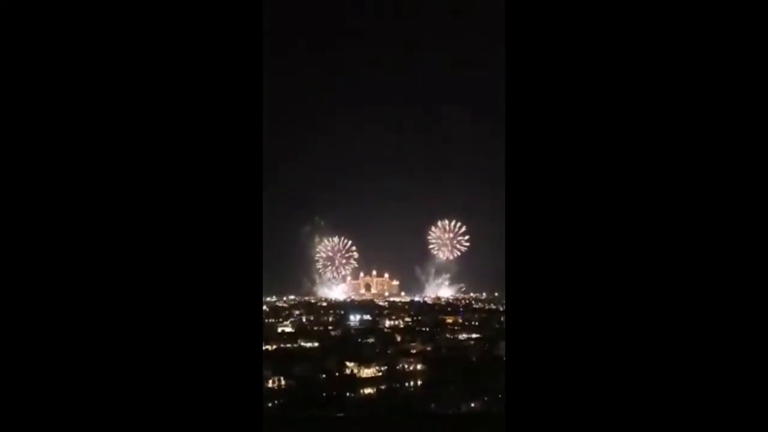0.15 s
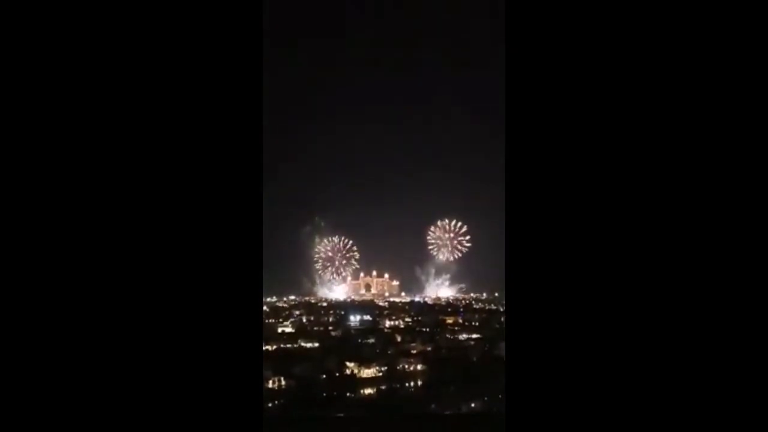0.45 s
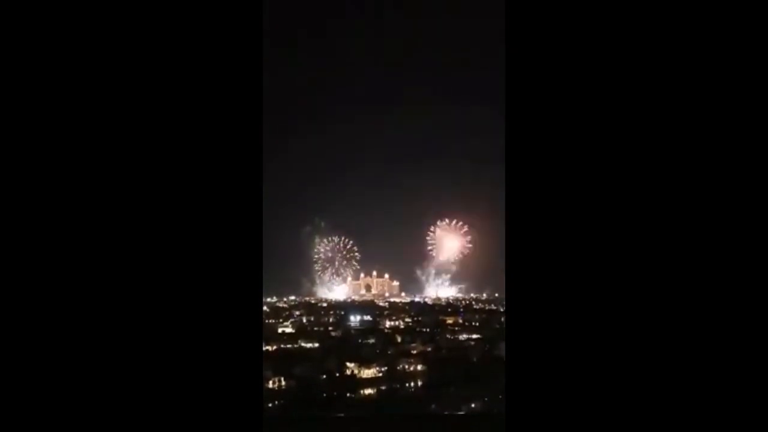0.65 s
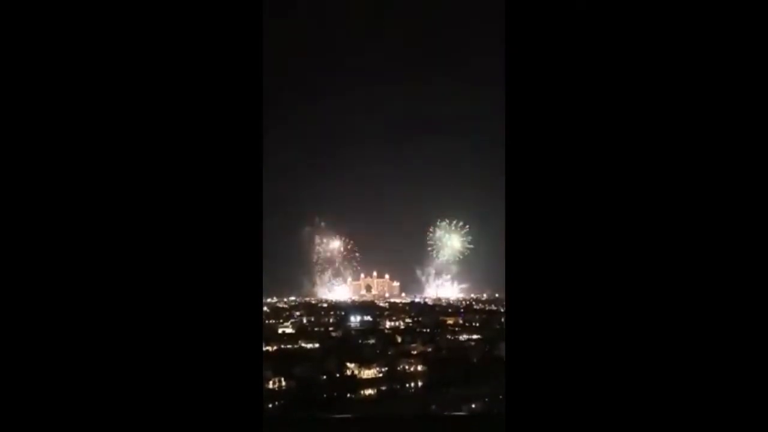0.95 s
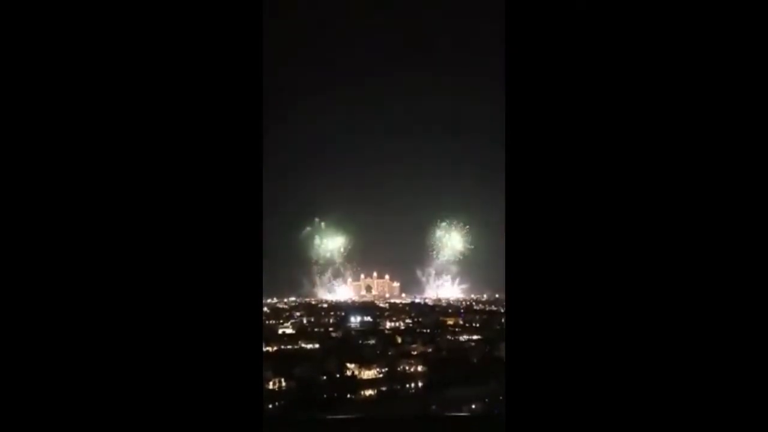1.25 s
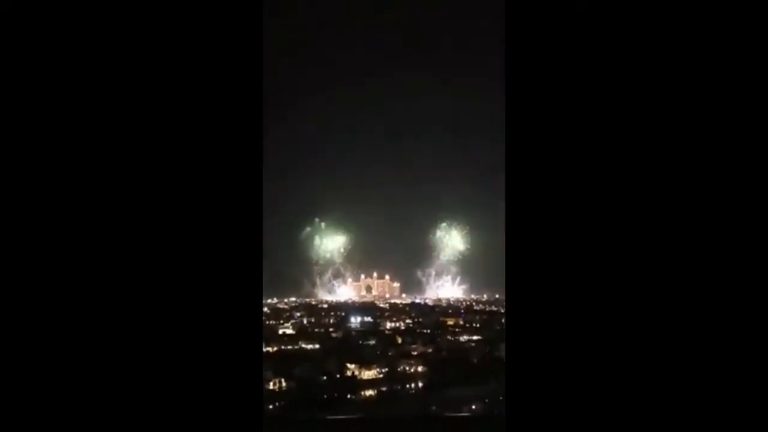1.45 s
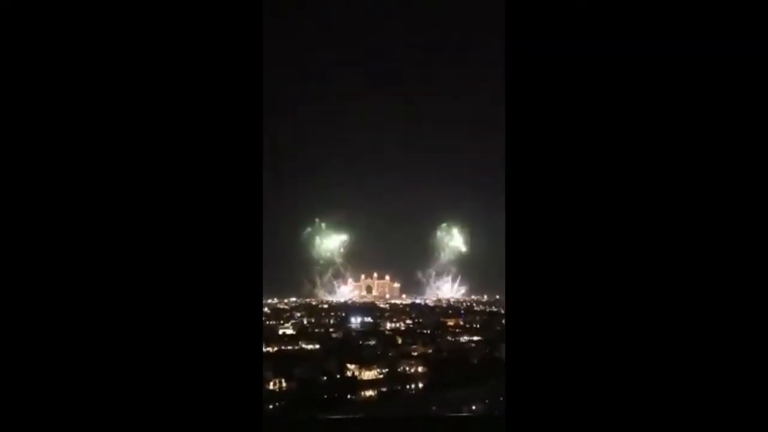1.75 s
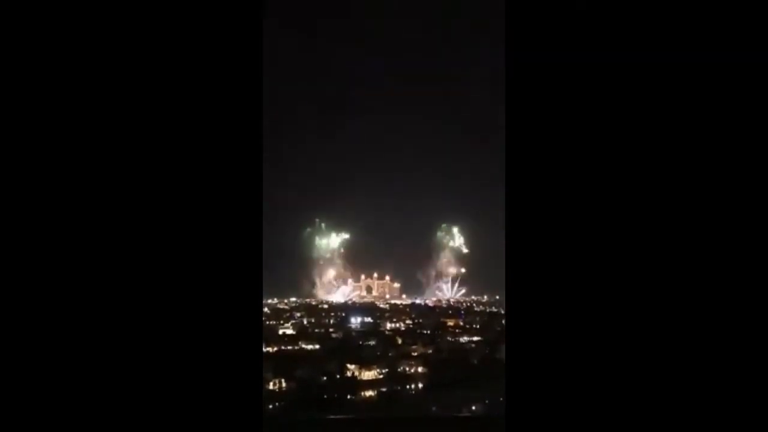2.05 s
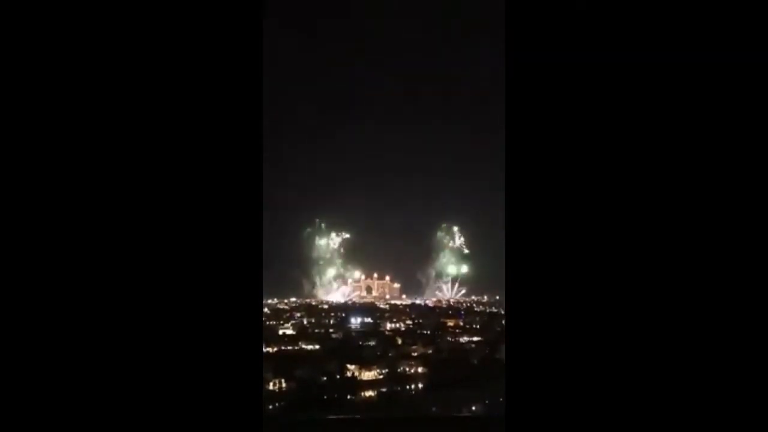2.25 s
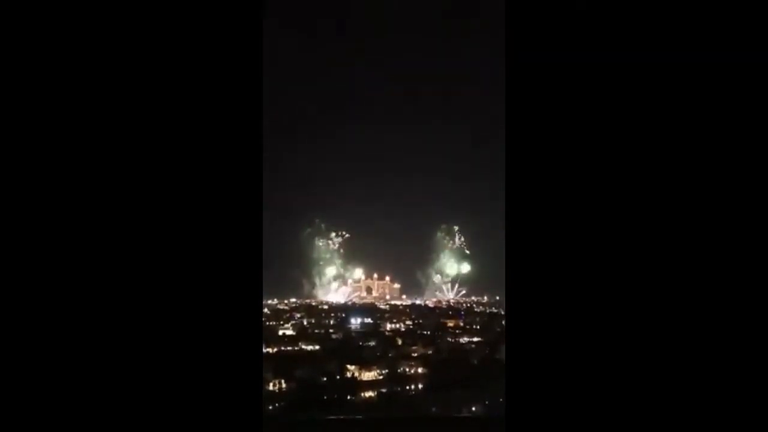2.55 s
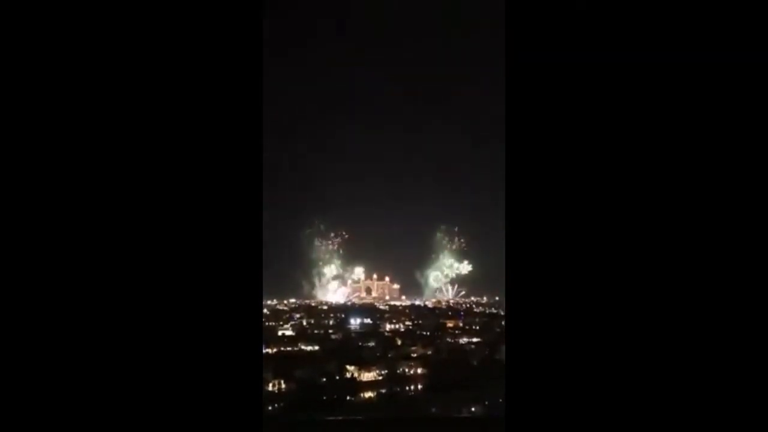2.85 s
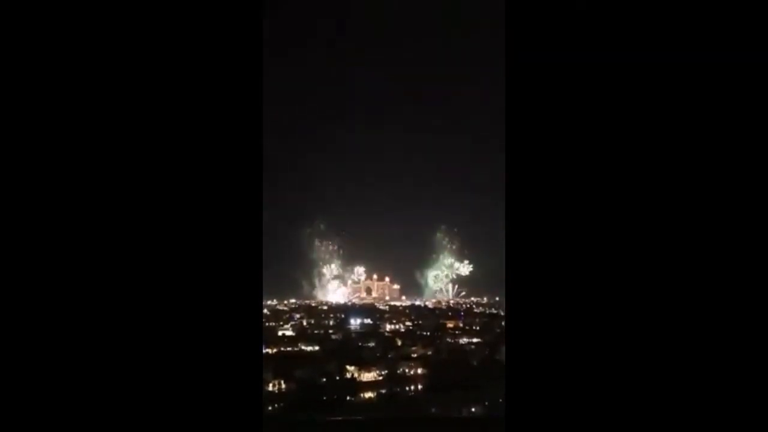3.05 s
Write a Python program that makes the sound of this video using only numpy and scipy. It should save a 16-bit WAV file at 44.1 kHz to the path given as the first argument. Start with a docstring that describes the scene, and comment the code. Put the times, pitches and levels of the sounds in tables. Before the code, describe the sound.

Distant fireworks bang over a low rumble and a faint city hush, heard from a balcony. At about 0.5 seconds a quick cluster of sharp bangs booms and echoes, thinning to weaker thuds by 1.2 seconds. More bangs arrive at 1.7 seconds, then a loud, dense volley around 2 seconds as the rumble swells. A softer boom follows at 2.6 seconds and a last bang near 2.9.

```python
"""First comes a low rumble over the hush of a city at night; then far-off fireworks bang in clusters.
Each bang is an N-shaped jump in air pressure that cracks, bounces off nearby walls, sets the
listener's balcony booming and rolls away over the roofs. Fainter fireworks merge into the rumble.
A few faint rustles sound close by, and one thin whistle sinks in pitch."""
import sys
import numpy as np
from scipy import signal
from scipy.io import wavfile
from scipy.ndimage import uniform_filter1d

SR = 44100
rng = np.random.default_rng(int(sys.argv[2]) if len(sys.argv) > 2 else 0)


def dump_mix(stems):
    """Bounce the given channels to the path in sys.argv[1] as a 16-bit WAV at rate SR."""
    frames = np.atleast_2d(stems).T  # one column per channel
    limited = np.clip(frames, -1, 1)  # hard clip at full scale
    pcm = np.round(limited * 32767).astype(np.int16)
    wavfile.write(sys.argv[1], SR, pcm)


N = 141120
TIME = np.arange(N) / SR


def from_db(db):
    """Turn decibels into a number to multiply a sound by."""
    return 10 ** (np.asarray(db) / 20)


def lean_left(db):
    """Left and right gains that make the left side this many decibels louder."""
    return from_db([[db / 2], [-db / 2]])


def at_pitch(table, hz, column=1):
    """Look up a pitch in a table, sliding smoothly between its rows."""
    table = np.array(table)
    return np.interp(np.log(hz), np.log(table[:, 0]), table[:, column])


def filtered(x, hz, kind, order=2):
    """Keep the "low" part, the "high" part or a "band"; a higher order cuts more sharply."""
    return signal.sosfilt(signal.butter(order, hz, kind, fs=SR, output="sos"), x + 1e-18)


def unit_level(x):
    """Scale a sound to an average (rms) level of 1."""
    return x / np.sqrt(np.mean(x ** 2) + 1e-20)


def resonate(x, tones):
    """Let a sound set tones ringing; each fades by 60 dB in its ring_s."""
    out = 0
    for hz, db, ring_s in tones:
        decay = from_db(-60 / (ring_s * SR))
        feedback = [1, -2 * decay * np.cos(2 * np.pi * hz / SR), decay ** 2]
        out += from_db(db) * (1 - decay ** 2) / 2 * signal.lfilter([1, 0, -1], feedback, x + 1e-18)
    return out


def reverberate(x, echoes):
    """Smear a sound through a stereo pattern of echoes."""
    return signal.fftconvolve(x[None], unit_level(echoes) / np.sqrt(N), axes=1)[:, :N]


def evened(band, window_s=0.044):
    """Smooth out the chance swells in a band of noise."""
    local_power = uniform_filter1d(np.mean(band ** 2, axis=0), int(window_s * SR))
    return band * np.sqrt(np.mean(band ** 2) / (np.abs(local_power) + 1e-20))


# How alike the two ears hear noise (1 is identical): pitch_hz, likeness
EAR_LIKENESS = [(50, 1), (125, 0.98), (250, 0.99), (500, 0.59), (1000, 0.43), (2000, 0.15), (4000, 0.032),
                (9000, 0.017)]
def noise_bands():
    """Half-octave bands of stereo noise, alike in the bass and unrelated in the treble."""
    edges_hz = 20 * 2 ** np.arange(0, 9.6, .5)
    white = rng.standard_normal((2, 2, N))
    for k, (low, high) in enumerate(zip(edges_hz, edges_hz[1:])):
        shared, side = filtered(white[k % 2], [low, high], "band")
        hz = np.sqrt(low * high)
        alike = at_pitch(EAR_LIKENESS, hz)
        yield hz, np.sqrt(1 + alike) * shared + np.sqrt(1 - alike) * np.array([side, -side])


def restless_noise(colour, wander_db, changes_per_s):
    """Noise whose bands each swell and sink at random."""
    out = 0
    for hz, band in noise_bands():
        wander = np.interp(TIME * changes_per_s, np.arange(400), rng.standard_normal(400))
        out += band * from_db(at_pitch(colour, hz) + wander_db * wander)
    return unit_level(out)


# The tone colour of the city: pitch_hz, relative_db
CITY_COLOUR = [(100, 5.5), (400, -1), (700, 2.5), (1000, 3), (1400, -3.5), (2000, -7), (2800, -12),
               (3600, -24.5), (5000, -20), (8700, -30.5), (12000, -43.5)]
def city(level_db=-50.5, top_hz=9200):
    """The steady hush of the city."""
    hush = restless_noise(CITY_COLOUR, wander_db=1.34, changes_per_s=8.75)
    return from_db(level_db) * filtered(hush, top_hz, "low", order=8)


# How loud the rumble is as time passes: time_s, level_db
RUMBLE_LOUDNESS = [(0, -37), (.4, -40), (.9, -40), (1.25, -39), (1.68, -40), (1.85, -33.5), (2.2, -33),
                   (2.45, -34), (2.7, -33), (3.0, -35.5), (3.2, -36.5)]
# The tone colour of the rumble: pitch_hz, relative_db
RUMBLE_COLOUR = [(20, -19), (35, -3.5), (48, 7), (75, 1.5), (110, 7), (160, -1), (260, -1.5), (370, -8),
                 (480, -20), (700, -19), (1400, -71)]
def rumble():
    """Faint fireworks and old echoes merge into an uneven rumble."""
    level_db = np.interp(TIME, *np.transpose(RUMBLE_LOUDNESS))
    return from_db(level_db) * restless_noise(RUMBLE_COLOUR, wander_db=3, changes_per_s=14)


def whistle(peak_s=1.19, swell_s=.17, pitch_hz=3760, fall_hz_per_s=1000, width_hz=280, level_db=-66.5):
    """A thin, airy tone swells and fades as it sinks in pitch."""
    from_peak_s = TIME - peak_s
    phase = 2 * np.pi * np.cumsum(pitch_hz - fall_hz_per_s * from_peak_s) / SR
    flutter = filtered(rng.standard_normal((2, 2, N)), width_hz / 2, "low")
    tone = unit_level(flutter[0] * np.cos(phase) + flutter[1] * np.sin(phase))
    return from_db(level_db) * tone * np.exp(-2 * (from_peak_s / swell_s) ** 2)


# Faint sounds close by: start_s, rise_s, fade_s, pitch_hz, width_hz, level_db
NEARBY_RUSTLES = [(0.662, 0.0064, 0.072, 8370, 600, -66.5), (0.98, 0.22, .3, 8200, 2200, -73.5),
                  (1.221, .005, 0.026, 4200, 2400, -55), (2.72, .02, 0.065, 7160, 2470, -66),
                  (3.0, .015, .045, 2960, 500, -62)]
def rustles():
    """Small ticks and squeaks, each a narrow hiss that rises and fades."""
    out = np.zeros((2, N))
    for start_s, rise_s, fade_s, hz, width_hz, db in NEARBY_RUSTLES:
        edges_hz = [hz - width_hz / 2, hz + width_hz / 2]
        hiss = unit_level(filtered(rng.standard_normal((2, N)), edges_hz, "band", order=3))
        age_s = TIME - start_s
        out += from_db(db) * hiss * np.clip(age_s / rise_s, 0, 1) * np.exp(-(age_s / fade_s) ** 2)
    return out


# The echo from the roofs: pitch_hz, relative_db, fade_s (time to drop 60 dB)
ROOF_ECHO = [(30, -6.5, 0.44), (55, -2, 0.57), (101, -2, 0.53), (182, -9.5, 0.76), (327, -1.5, 0.67),
             (444, -5, 0.42), (570, -1, 0.25), (750, -10.5, 0.29), (1430, 7, 0.26), (4020, -13.5, 0.22)]
def roofs(blasts, gain_db=1.5, build_s=0.0046):
    """Countless far echoes build up and die away smoothly, the highs first."""
    echoes = 0
    for hz, band in noise_bands():
        fade_s = at_pitch(ROOF_ECHO, hz, column=2)
        echoes += evened(band) * from_db(at_pitch(ROOF_ECHO, hz) - 60 * TIME / fade_s)
    build_up = 1 - np.exp(-TIME / build_s)
    return from_db(gain_db) * reverberate(blasts, echoes * build_up)


# Bounces off nearby walls: delay_ms, gain_db
WALL_BOUNCES = [(3.9, -9), (8.3, -12), (12.6, -11)]
def walls(blasts, top_hz=750, ear_gap_ms=0.18):
    """Walls send back dull copies, from the left and right in turn."""
    dull = filtered(blasts, top_hz, "low")
    out = np.zeros((2, N))
    for k, (delay_ms, db) in enumerate(WALL_BOUNCES):
        for ear in range(2):
            lag_s = (delay_ms + ear_gap_ms / 2 * (-1) ** (k + ear)) / 1000
            out[ear] += from_db(db) * np.interp(TIME - lag_s, TIME, dull)
    return out


# The natural tones of the balcony's air: pitch_hz, gain_db, ring_s, left_minus_right_db
BALCONY_TONES = [(52.2, 5, 0.24, -1), (108.2, 11, 0.67, 2), (245, -6, 0.25, -0.5), (343, 2, 0.029, 5),
                 (386, -1, 0.17, 0), (440, -6, 0.44, 1), (505, -4.5, 0.65, 10), (685.7, 3, 0.11, 3)]
def balcony(boom_push, ring_push, ring_above_hz=480):
    """The half-enclosed air booms at its low tones and rings at its high ones."""
    out = 0
    for hz, db, ring_s, left_db in BALCONY_TONES:
        push = ring_push if hz > ring_above_hz else boom_push
        out += resonate(push, [(hz, db, ring_s)]) * lean_left(left_db)
    return out


# The hollow knock of a blast: pitch_hz, gain_db, ring_s
KNOCK_TONES = [(386, -4, 0.13), (583, -12.5, 0.055), (771, -3.5, 0.12), (1010, -13.5, 0.023)]
# Brief, bright ringing that a blast sets off near the listener: pitch_hz, gain_db, ring_s
CRACK_TONES = [(1380, -8, .011), (1690, -5.5, .01), (1830, -10, .012), (2080, -13, .009), (2600, -13, .011),
               (3100, -24, .009), (4150, -19, .012)]
def knock_and_crack(knock_push, crack_push, top_hz=4600, bounce_s=0.00285, scatter_s=0.22):
    """A blast's sharp front rings briefly, bounces off the nearest wall and scatters off other things."""
    knock = filtered(resonate(knock_push, KNOCK_TONES), top_hz, "low", order=8)
    ringing = filtered(resonate(crack_push, CRACK_TONES), top_hz, "low", order=8)
    bare_edge = from_db(-41.5) * filtered(crack_push, 3000, "high")
    crack = ringing + bare_edge
    bounce = from_db(-5) * np.interp(TIME - bounce_s, TIME, crack)
    snap = knock + crack + bounce
    echoes = rng.standard_normal((2, N)) * from_db(-60 * TIME / scatter_s)
    return snap * lean_left(2.4) + from_db(-3.5) * reverberate(snap, echoes)


def n_wave(start_s, length_ms, jump_ms=0.076):
    """Air pressure jumps up, falls evenly below normal and jumps back, like the letter N."""
    age_ms = (TIME - start_s) * 1000
    on_off = (np.tanh(age_ms / jump_ms) - np.tanh((age_ms - length_ms) / jump_ms)) / 2
    return (1 - 2 * age_ms / length_ms) * on_off


def shock_front(start_s, fall_ms=1.0):
    """The sharp leading edge of a blast."""
    age_ms = (TIME - start_s) * 1000
    return (age_ms > 0) * np.exp(-np.abs(age_ms) / fall_ms)


# One row per arriving blast or echo of one; the later _db columns are added to level_db: start_s, level_db,
# length_ms, air_top_hz, knock_db, crack_db, crack_top_hz, boom_db, ring_db, roof_db
FIREWORK_BLASTS = [(0.475, -32, 2, 480, 13, 3.5, 1500, -8.5, -7.5, -10),
                   (0.5214, -4.5, 2.87, 324, -21, -5.5, 4000, -2, -16, -17),
                   (0.5249, -14, 3.46, 299, -16, -21, 2020, -4.5, -12, -8.5),
                   (0.5410, -15, 4.36, 403, -9, -2.5, 2590, 5.5, -6.5, -1),
                   (0.5511, -19, 3.4, 398, -3, -9, 2000, -9.5, -10, -3),
                   (0.577, -9.5, 3.2, 488, -2, -9.5, 2800, 0, -6.5, -8),
                   (0.5958, -19, 6.75, 420, 3.5, -4, 2230, 3, 2.5, -5.5),
                   (0.614, -22.5, 6.0, 420, -13, -11, 1500, 1.5, -1, -6),
                   (0.690, -24.5, 4.4, 328, -10, -22, 1200, -5, -6.5, -5),
                   (0.7590, -23, 2.9, 450, -2, -11, 1210, -18, -20, -13.5),
                   (0.881, -30, 2.3, 563, 9, -1, 1500, -12, -5, 0.5),
                   (1.195, -28.5, 4.5, 400, -12, -13, 1200, -4.5, -5, -5.5),
                   (1.246, -28, 14, 300, -22, -22, 900, 3.5, -10, -13),
                   (1.6987, -10, 3.15, 480, 11.5, -7, 3290, 1, -5.5, -8),
                   (1.7103, -16, 7.4, 393, -7, -9.5, 2990, 3, -8, -6),
                   (1.7380, -17.5, 2.75, 476, -3, -11.5, 2600, -1, -3, -11.5),
                   (1.8350, -21, 3.6, 328, -13, -24.5, 900, 4, -10, -9),
                   (1.8780, -26.5, 3.9, 386, -13, -24, 880, -3, -5, -10),
                   (1.9890, -4.5, 7.78, 475, -4.5, 1, 4430, 4, 10.5, -12.5),
                   (2.0096, -14, 7.7, 520, 7.5, -10, 2800, 1.5, -7.5, -14),
                   (2.0213, -10.5, 6.06, 526, -1.5, 1, 3170, 5.5, 7, -14),
                   (2.047, -11, 11, 296, 3, -19, 2400, -9, -3.5, -17),
                   (2.0650, -11, 6.5, 420, 8, -15, 2190, -19, -6, -18),
                   (2.0815, -16, 10.9, 262, 2, -15, 1490, -9, -7.5, -17.5),
                   (2.110, -18.5, 16, 200, -3, -7, 2400, -15, -7.5, -15),
                   (2.127, -21, 7.5, 200, -11.5, -18, 1500, -13, -12, -10.5),
                   (2.2750, -27, 8.0, 406, -12, -23, 900, 3.5, -5.5, -12),
                   (2.5950, -27.5, 11.4, 450, 10, -6, 1180, 10, -6, -10.5),
                   (2.883, -16, 2.8, 482, 6, -20, 1340, -3.5, -1, -9.5),
                   (2.905, -25, 2.7, 477, 5, -18, 1200, -16, -18, -18)]
def fireworks():
    """Each blast is dulled by its own path through the air, then sets the surroundings sounding."""
    direct, boom_push, ring_push, roof_push, knock_push, crack_push = np.zeros((6, N))
    for (start_s, level_db, length_ms, air_top_hz, knock_db, crack_db, crack_top_hz,
         boom_db, ring_db, roof_db) in FIREWORK_BLASTS:
        wave = from_db(level_db) * n_wave(start_s, length_ms)
        direct += filtered(wave, air_top_hz, "low", order=3)
        thud = filtered(wave, air_top_hz, "low")
        boom_push += from_db(boom_db) * thud
        ring_push += from_db(ring_db) * thud
        roof_push += from_db(roof_db) * thud
        front = from_db(level_db) * shock_front(start_s)
        knock_push += from_db(knock_db) * front
        crack_push += from_db(crack_db) * filtered(front, crack_top_hz, "low")
    surroundings = walls(direct) + balcony(boom_push, ring_push) + roofs(roof_push)
    return direct * lean_left(0.6) + surroundings + knock_and_crack(knock_push, crack_push)


def scene():
    """Fireworks over the night-time city."""
    return fireworks() + rumble() + city() + rustles() + whistle()


def record(dry, bottom_hz=6.7, ceiling=.88, top_hz=13500):
    """The microphone loses the deepest bass and rounds the tallest peaks; the highest treble is cut."""
    x = filtered(dry, bottom_hz, "high")
    rounded = x / (1 + (x / ceiling) ** 6) ** (1 / 6)
    return signal.sosfilt(signal.cheby2(12, 70, top_hz, fs=SR, output="sos"), rounded)


dry = scene()
out = record(dry)
dump_mix(out)
```